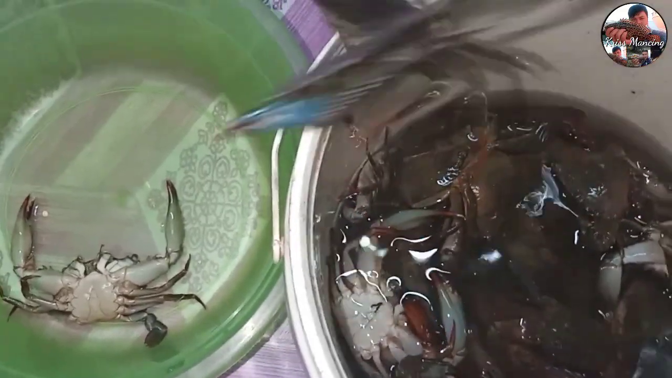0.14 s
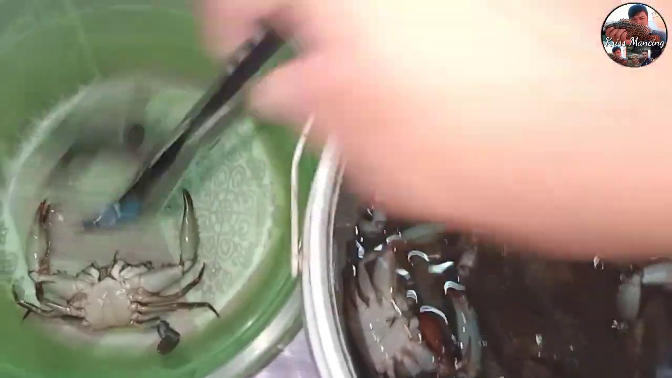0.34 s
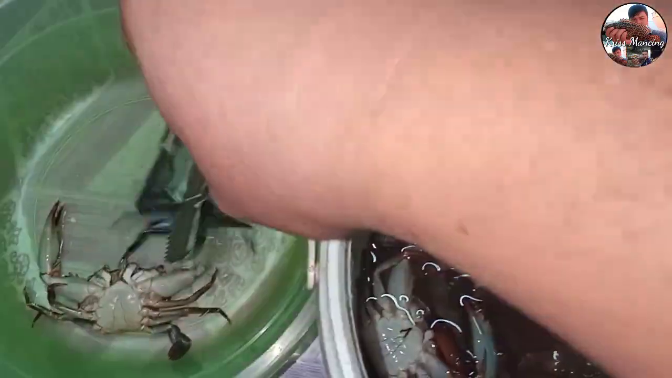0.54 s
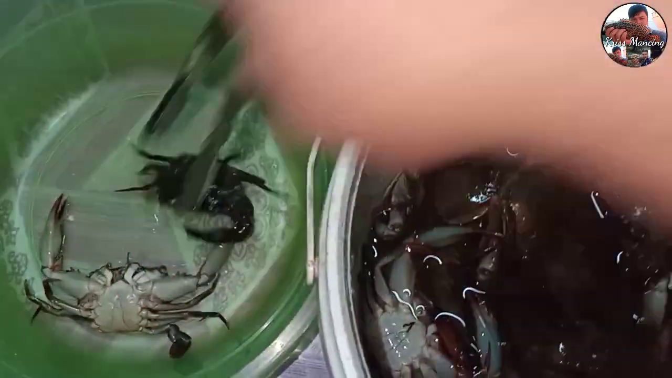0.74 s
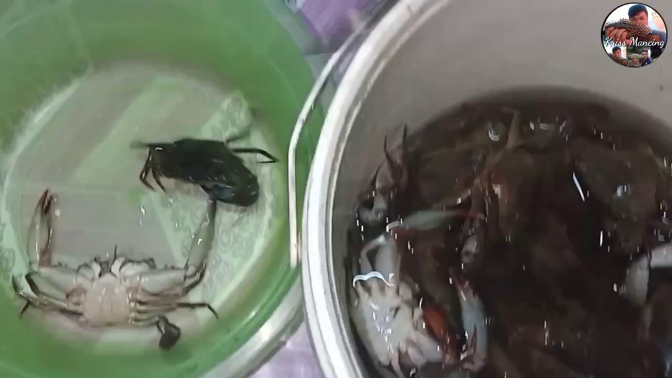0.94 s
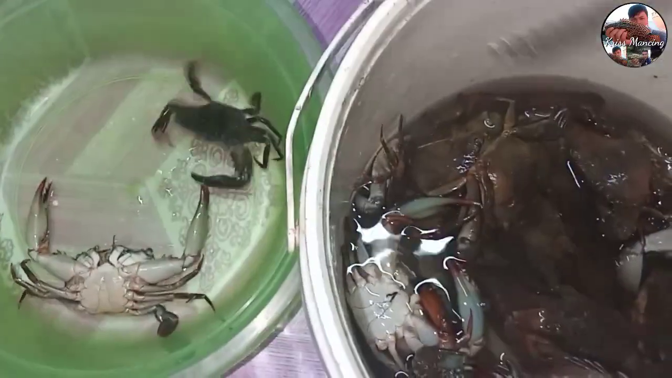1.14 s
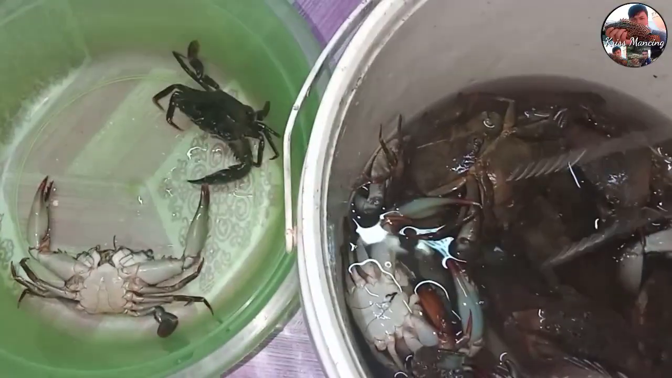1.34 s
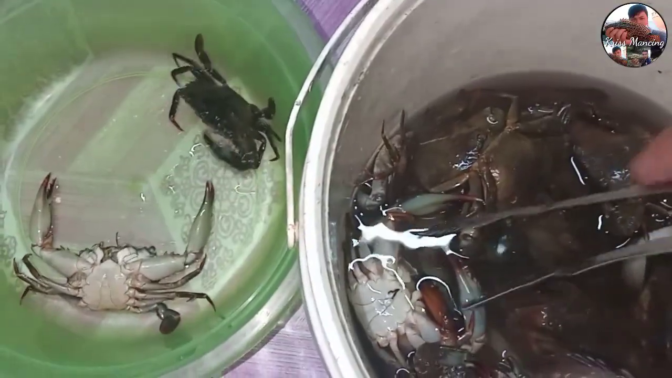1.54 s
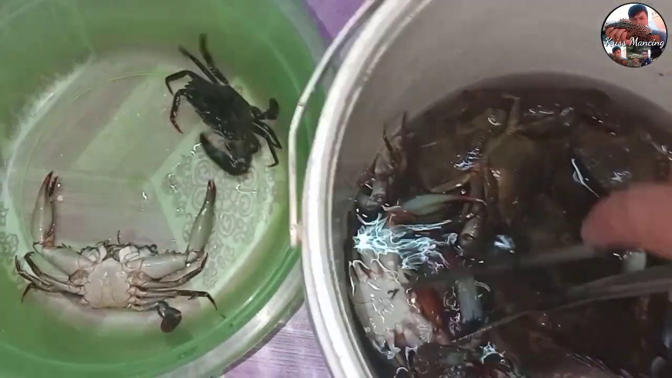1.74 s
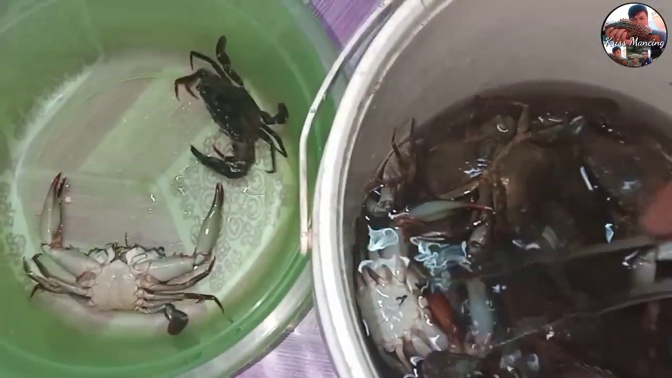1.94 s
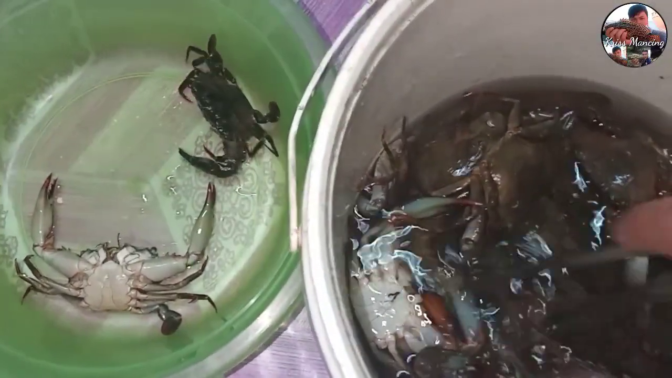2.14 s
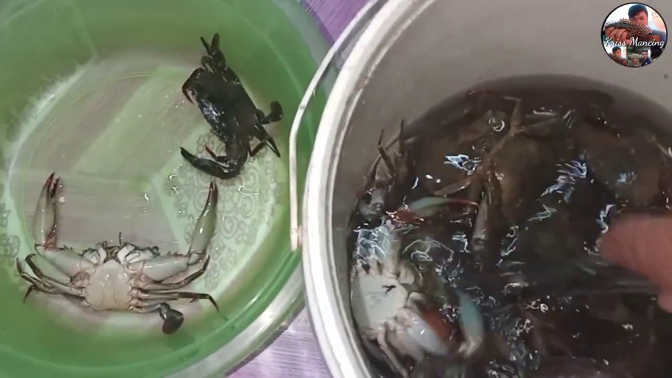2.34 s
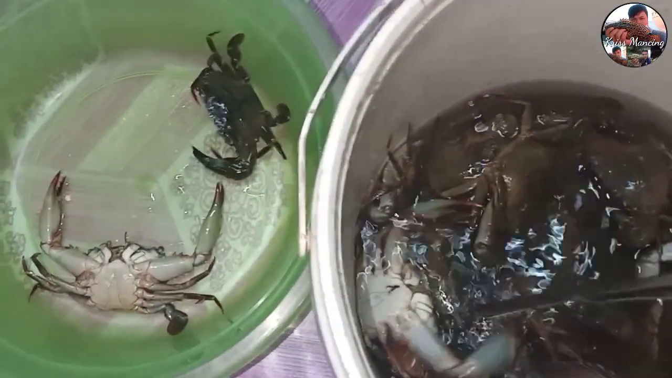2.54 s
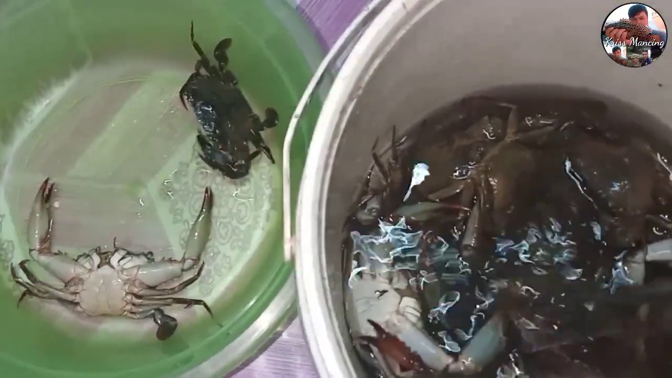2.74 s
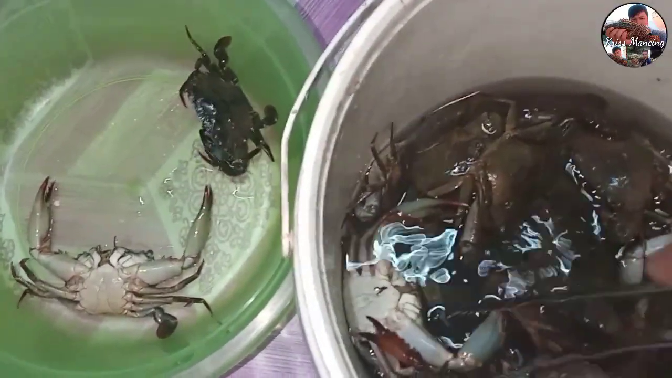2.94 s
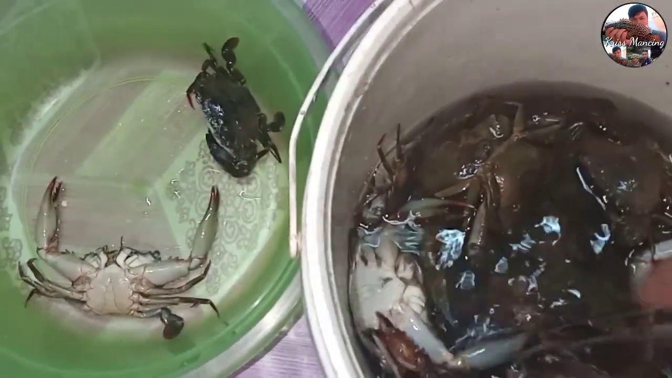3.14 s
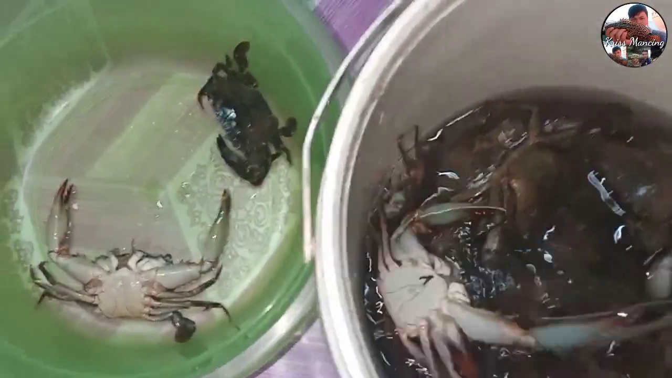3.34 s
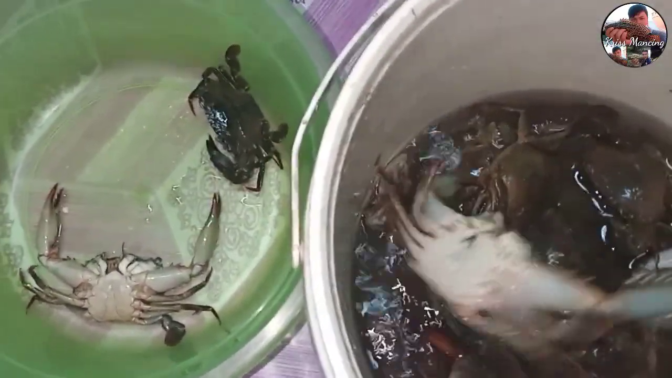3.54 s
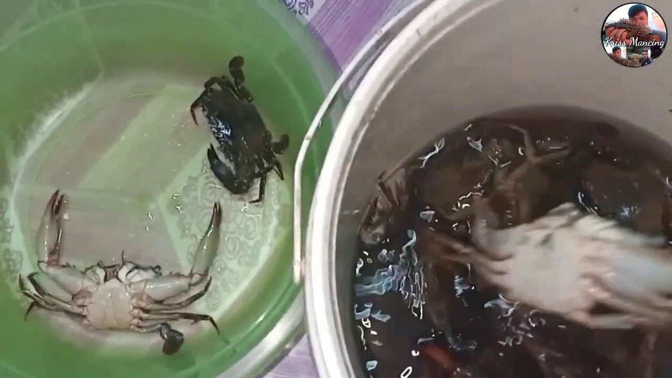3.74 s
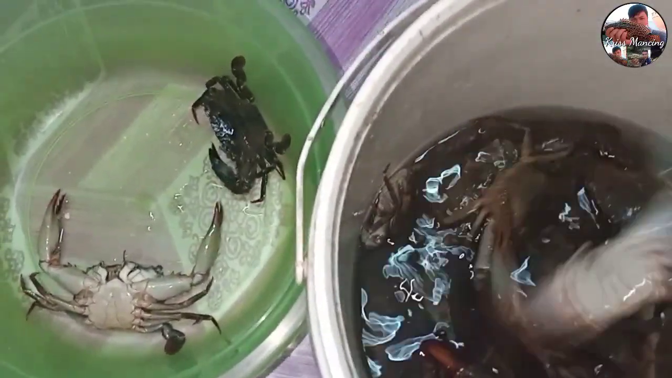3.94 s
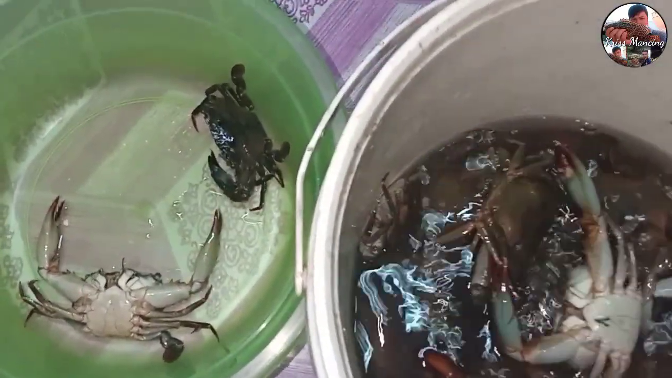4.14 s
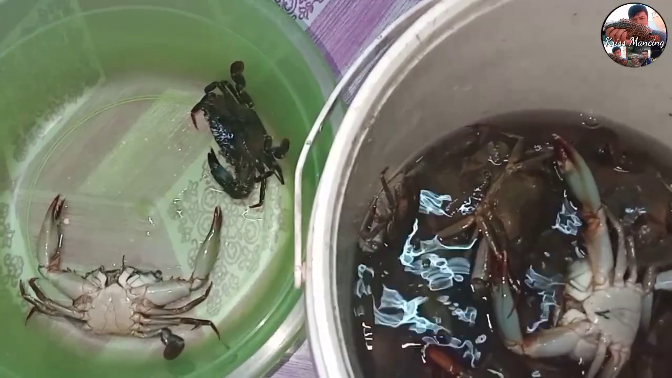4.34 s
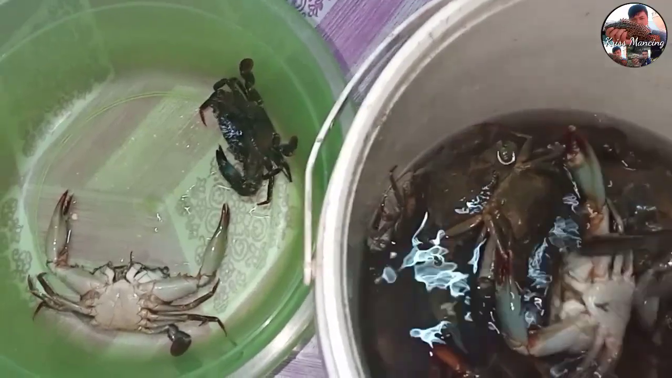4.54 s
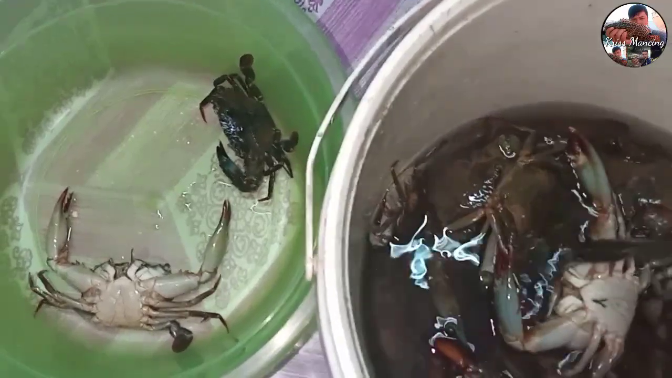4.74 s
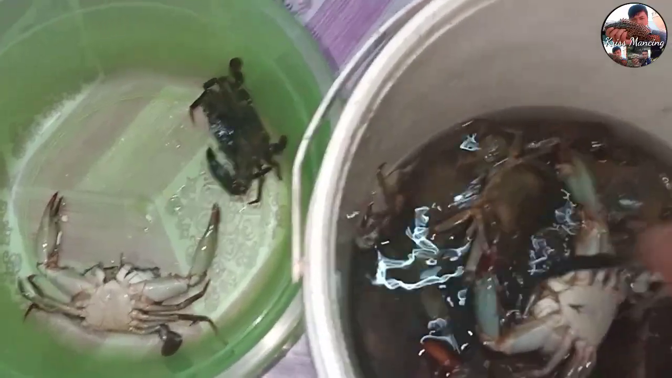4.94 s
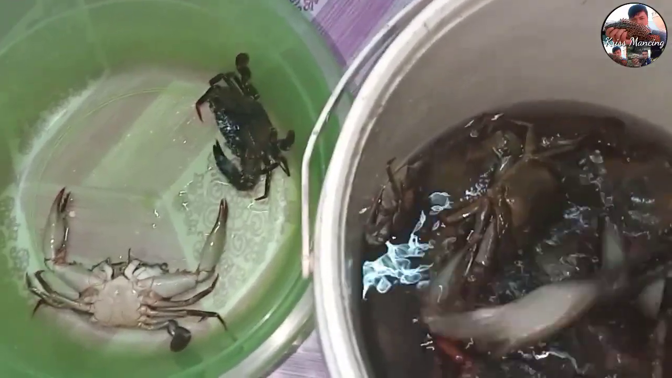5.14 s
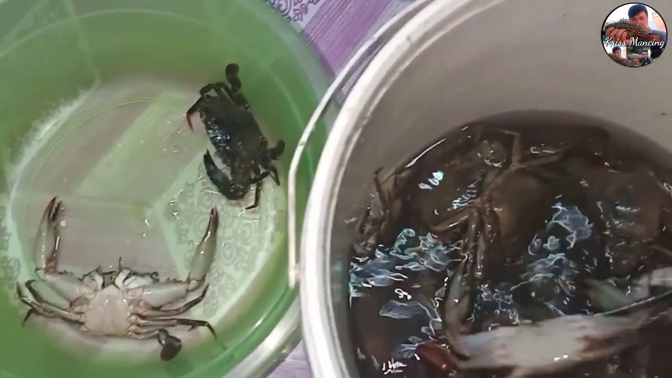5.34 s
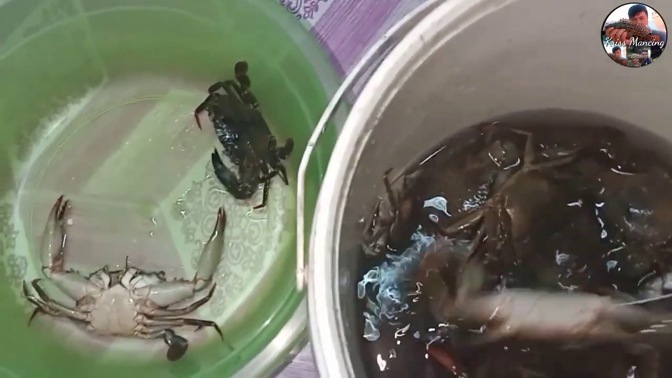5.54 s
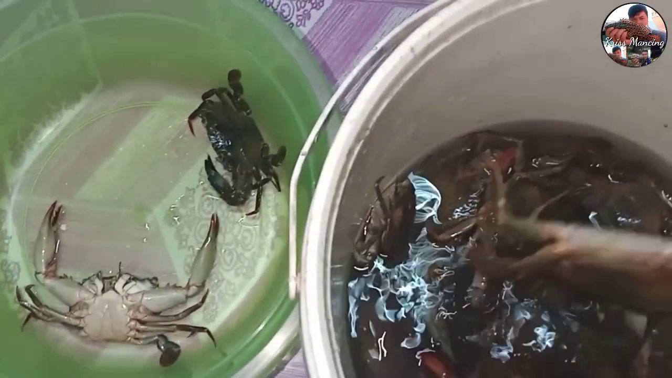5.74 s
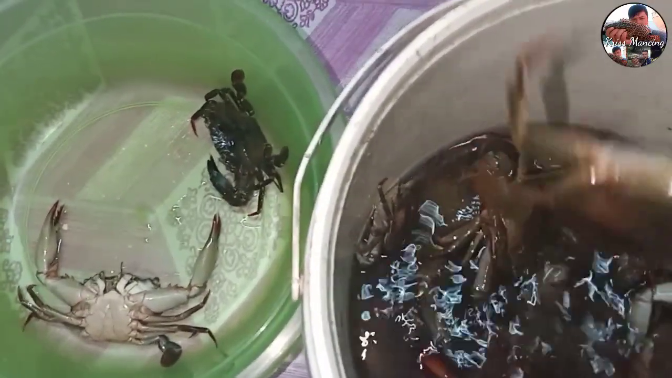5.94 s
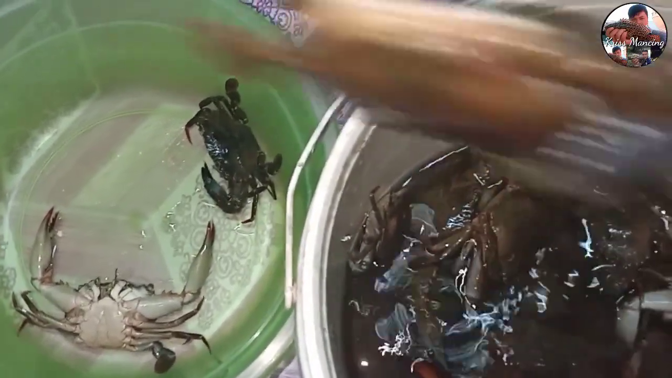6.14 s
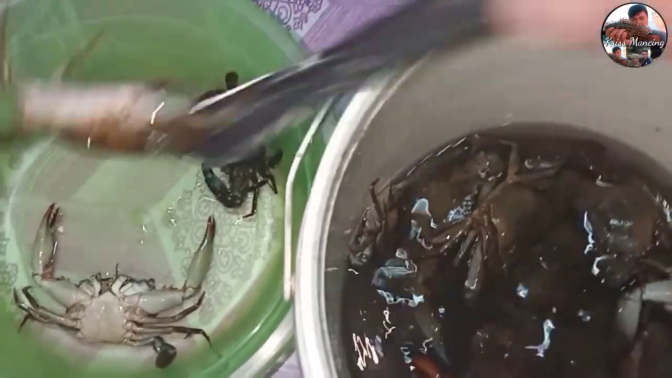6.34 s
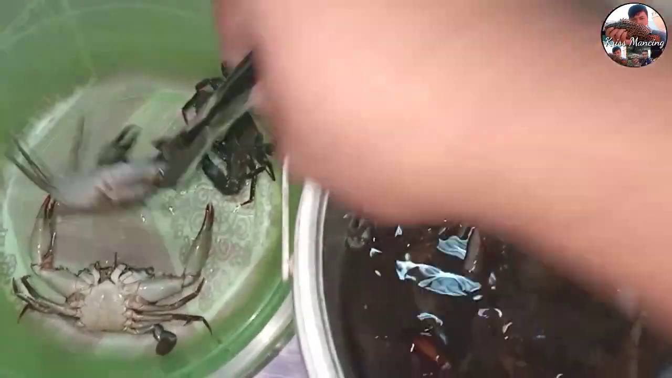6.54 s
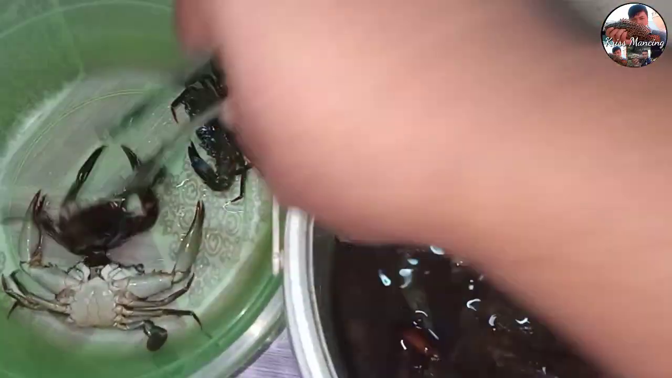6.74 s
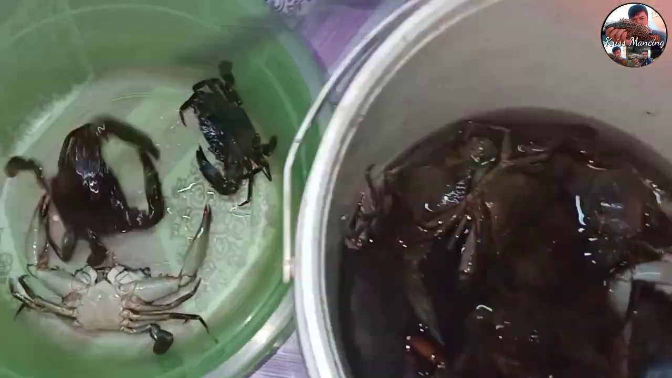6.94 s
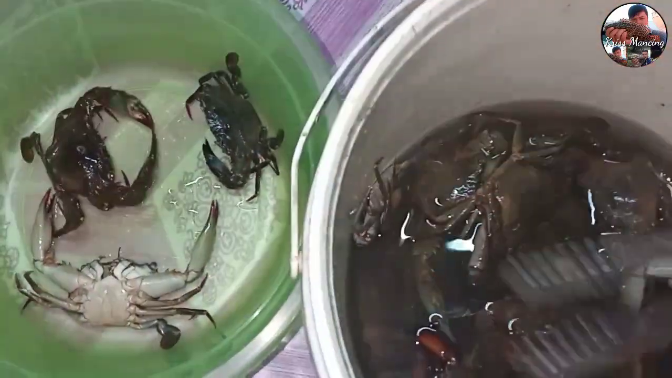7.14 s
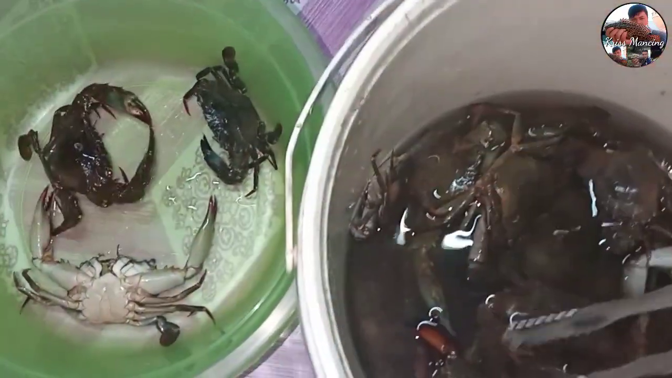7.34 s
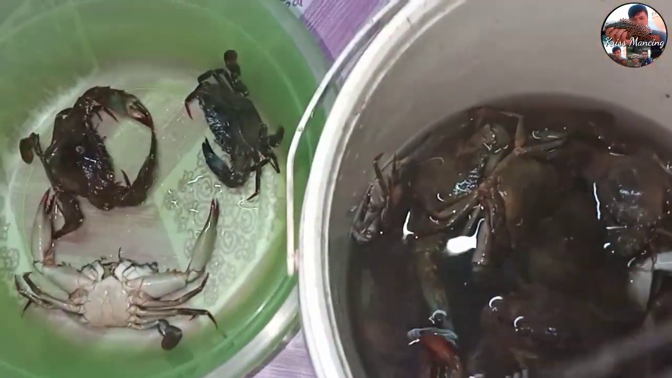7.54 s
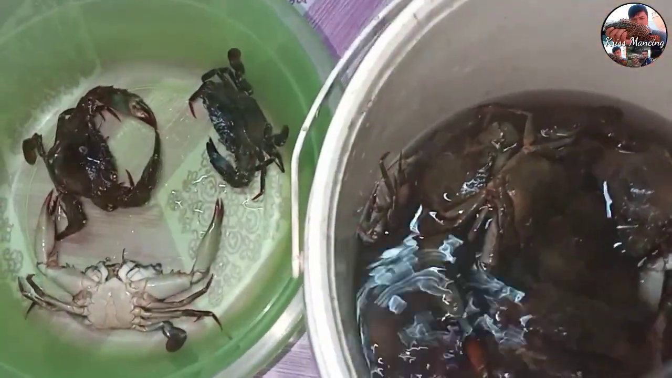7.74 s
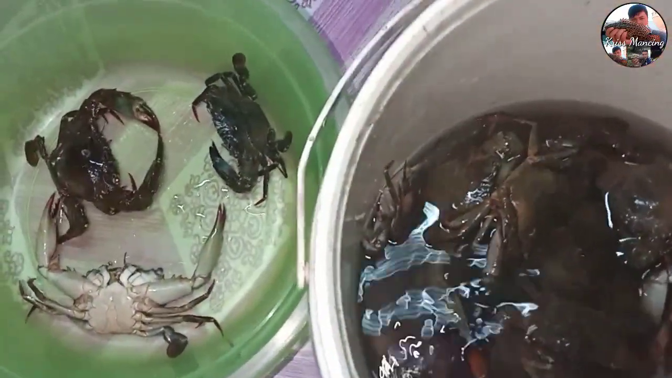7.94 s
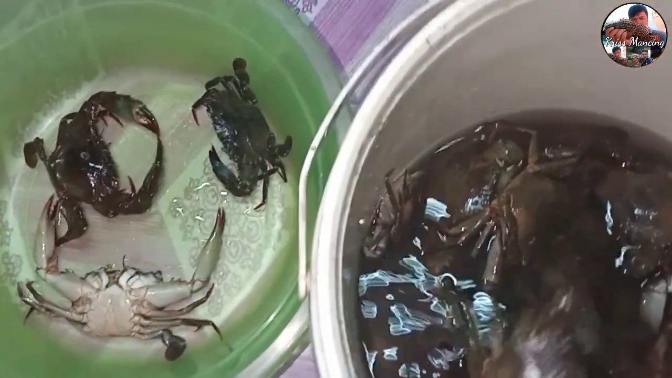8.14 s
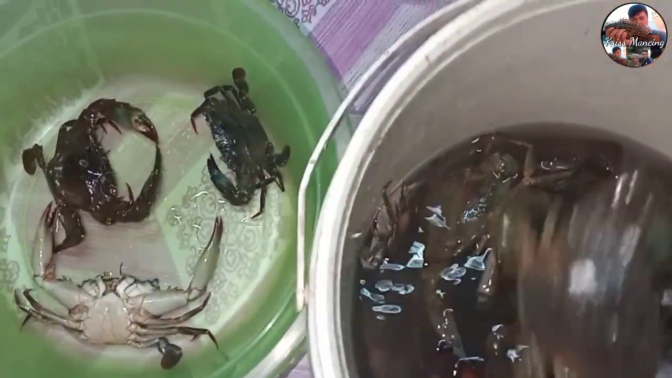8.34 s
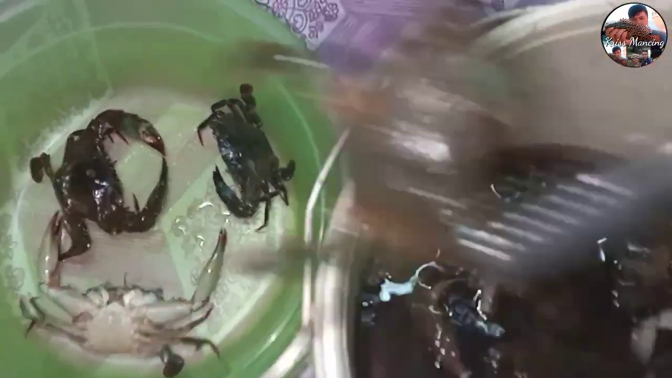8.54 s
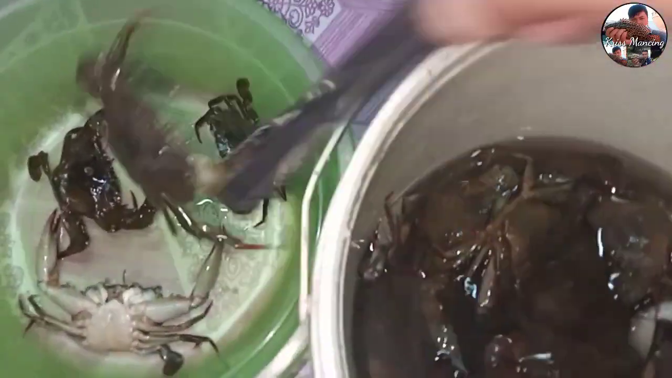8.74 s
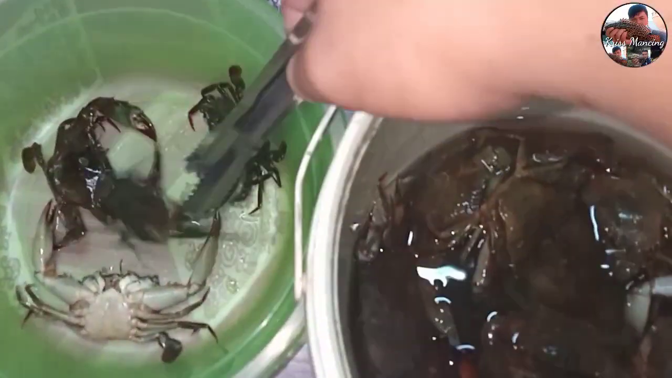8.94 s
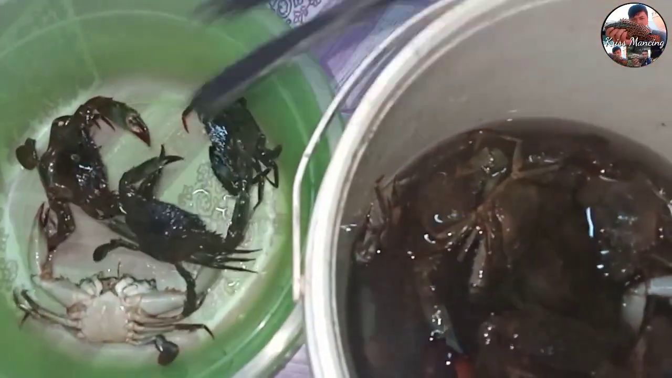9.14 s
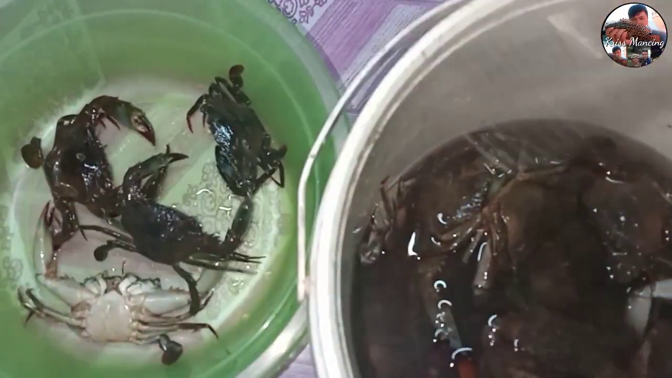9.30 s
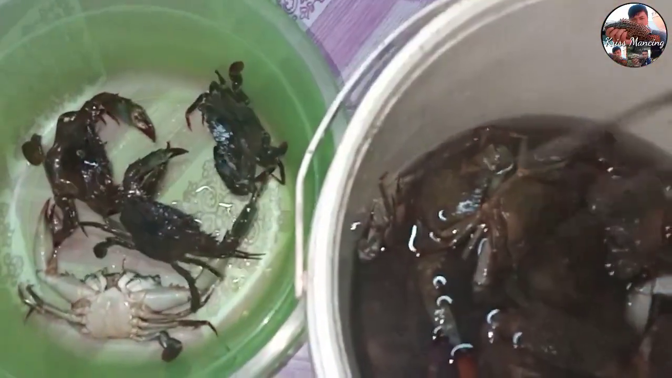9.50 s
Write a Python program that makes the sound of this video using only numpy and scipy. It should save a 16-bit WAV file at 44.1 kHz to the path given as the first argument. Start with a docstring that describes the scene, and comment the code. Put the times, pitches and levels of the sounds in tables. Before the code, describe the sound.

Close up in a small room, a crab knocks and scrabbles on a plastic basin, then steel tongs scrape and stir through wet shells in a bucket, with low thumps and two violent snaps. Another crab clatters into the basin, the tongs stir briefly, and a final crab lands in a hard rattle. A thin wavering whine and faint hum stay behind.

```python
"""Over a bucket of shallow water and a plastic basin, steel tongs lift live crabs from one into the other.
Shells knock and scrabble on the basin and the tongs clack on its rim: short pitched rings and filtered noise
bursts, grains for the legs. In the bucket the tongs scrape, squeak and stir: shaped noise through steel, shell
and water colours, with low overload thumps. Twice the tongs snap shut close by: a falling blast, a pop and a
steel ring. Behind lie a whine of narrow noise bands, a pulsing insect, mains hum and air; a limiter ducks and
clips the hardest blows."""
import sys
import numpy as np
from scipy import signal
from scipy.fft import rfft, irfft, next_fast_len
from scipy.io import wavfile
from scipy.ndimage import uniform_filter1d, minimum_filter1d, map_coordinates

SR = 44100
rng = np.random.default_rng(int(sys.argv[2]) if len(sys.argv) > 2 else 0)


def waveform_to_disk(signal):
    """Save audio, clipped to [-1, 1], as 16-bit WAV at the path in sys.argv[1]."""
    frames = np.transpose(np.atleast_2d(signal))
    scaled = np.clip(frames, -1, 1) * 32767
    samples = np.round(scaled).astype(np.int16)
    wavfile.write(sys.argv[1], SR, samples)


N = 422037  # samples in the scene
SIZE = 4096  # samples in a short burst or impulse response
TOP_HZ = 15650  # upper edge of the sound


def amp(db):
    """Decibels to gain."""
    return 10 ** (np.asarray(db) / 20)


def unit(x):
    """Scale to rms 1."""
    return x / np.sqrt(np.mean(x ** 2) + 1e-20)


def along(points, hz):
    """Read a curve of (Hz, value) points on a log frequency axis."""
    point_hz, value = np.transpose(points)
    return np.interp(np.log(hz + 1), np.log(point_hz + 1), value)


def wobble(rate):
    """A smooth random curve through this many knots a second."""
    knots = rng.standard_normal(int(N * rate / SR) + 4)
    return map_coordinates(knots, [np.arange(N) * rate / SR])


def filtered(x, response):
    """Multiply the spectrum of x by a function of frequency."""
    m = next_fast_len(len(x) + SR // 4)
    return irfft(rfft(x, m) * response(np.fft.rfftfreq(m, 1 / SR)), m)[:len(x)]


def body(points):
    """Minimum-phase impulse response of a colour, with energy 1: the object answers the moment it is hit."""
    cepstrum = irfft(np.log(amp(along(points, np.fft.rfftfreq(SIZE, 1 / SR)))))
    cepstrum[1:SIZE // 2] *= 2
    cepstrum[SIZE // 2 + 1:] = 0
    h = irfft(np.exp(rfft(cepstrum)))
    return h / np.linalg.norm(h)


def through(x, h):
    """Sound x through an impulse response."""
    return signal.fftconvolve(x, h)[:len(x)]


def resonant(x, hz, q):
    """Sound x through one damped resonance."""
    return signal.lfilter(*signal.iirpeak(hz, q, SR), x)


def sized(x, length):
    """Give a burst the energy of this many seconds at rms 1."""
    return x * np.sqrt(length * SR / (np.sum(x ** 2) + 1e-20))


def add(track, s, x):
    """Mix x into the track at time s."""
    i = max(round(s * SR), 0)
    track[i:i + len(x)] += x[:len(track) - i]


def swell(t, rise_s, fall_s):
    """Envelope that builds up to time 0 and dies away."""
    return np.exp(-np.where(t < 0, (t / rise_s) ** 2, np.abs(t / fall_s)))


def grains(rate, hz, cycles, hiss):
    """Tiny contacts or bubbles at random times, each with its own pitch and size, over a hiss."""
    chance = rng.standard_normal((int(rate * N / SR), 2))
    t = np.arange(256) / SR
    pitch = np.minimum(hz * np.exp(.4 * chance[:, :1]), TOP_HZ)
    strength = amp(6 * np.minimum(chance[:, 1:], 2))
    waves = strength * np.sin(2 * np.pi * pitch * t) * np.exp(-pitch * t / cycles)
    at = rng.integers(0, N, (len(chance), 1)) + np.arange(len(t))
    contacts = np.bincount(at.ravel(), waves.ravel(), N)[:N]
    return unit(unit(contacts) + hiss * rng.standard_normal(N))


def effort(bouts, column, attack_s, release_db_per_s):
    """Gain per sample: each bout sets in quickly, holds its level for its length, then dies away."""
    t, gain = np.arange(N) / SR, np.zeros(N)
    for start, length, *level_db in bouts:
        release_db = release_db_per_s * np.maximum(t - start - length, 0)
        onset = np.clip((t - start) / attack_s, 0, 1)
        gain = np.maximum(gain, onset * amp(level_db[column] - release_db))
    return gain


def moments(bouts, count):
    """Random moments spread through the bouts, and the levels of the bout that each falls in."""
    start, length, *level_db = np.transpose(bouts)
    ends = np.cumsum(length)
    at = (np.arange(count) + rng.random(count)) / count * ends[-1]
    i = np.searchsorted(ends, at)
    return start[i] + ends[i] - at, np.array(level_db)[:, i]


# Decay of the room. Each row: frequency in Hz, time to fall 60 dB in seconds.
ROOM_DECAY = [(100, 0.06), (500, 0.26), (1500, 0.18), (3700, 0.24), (9000, 0.19), (15000, 0.35)]


def room(x, wet_db, near_db, near_t60):
    """Short near echoes and a longer room decay, made of noise tails redrawn five times a second."""
    out, step = np.zeros(N), SR // 5
    for i in range(0, N, step):
        hz, t, z = signal.stft(rng.standard_normal((2, SR // 3)), SR, nperseg=256)
        far_fade = amp(-60 * t / along(ROOM_DECAY, hz)[:, None])
        far = signal.istft(z[0] * far_fade, SR, nperseg=256)[1]
        near = signal.istft(z[1] * amp(-60 * t / near_t60), SR, nperseg=256)[1]
        tail = amp(wet_db) * far / np.linalg.norm(far) + amp(near_db) * near / np.linalg.norm(near)
        add(out, i / SR + .002, signal.fftconvolve(x[i:i + step], tail))
    return out


# Colour of the faint room noise. Each row: frequency in Hz, relative density in dB per Hz.
AIR_COLOUR = [(25, -12.5), (45, 19), (100, 14), (160, 16.5), (250, 10.5), (400, 11.5), (480, 8), (560, 9),
              (1000, 2.5), (2300, 10.5), (3700, 1), (5400, -15.5), (9000, -26.5), (11000, -29),
              (16000, -23)]


def air(level_db=-53):
    """Faint room noise: steady random pressure with a fixed colour."""
    return amp(level_db) * unit(filtered(rng.standard_normal(N), lambda f: amp(along(AIR_COLOUR, f))))


# Mains hum. Each row: frequency in Hz, rms level in dB.
HUM_TONES = [(50, -75.5), (100.4, -55.5), (400.5, -67)]


def hum():
    """Mains tones whose phases wander slightly."""
    t = np.arange(N) / SR
    return sum(np.sqrt(2) * amp(db) * np.sin(2 * np.pi * hz * t + .25 * wobble(2.8)) for hz, db in HUM_TONES)


# Close resonances of the whine. Each row: centre in Hz, half-width at -6 dB in Hz, relative level in dB.
WHINE_PEAKS = [(2114, 25, -17.5), (2340, 33, -11.5), (2233, 47, -3), (2342, 20, 2.5), (2330, 9.2, -10),
               (2578, 18, -10.5), (2420, 18, 0.5), (2450, 11, 4.5), (2506, 20, -12), (2400, 18, -12)]


def whine(level_db=-43):
    """Noise through narrow resonances set so close that they beat against each other."""
    def peaks(f):
        return np.sqrt(sum(amp(db) ** 2 / (1 + ((f - hz) / width) ** 2) ** 2 for hz, width, db in WHINE_PEAKS))
    return amp(level_db) * unit(filtered(rng.standard_normal(N), peaks))


def insect(hz=7400, q=10, level_db=-69.5):
    """A far insect's high trill: a narrow noise band pulsing about nine times a second."""
    trill = unit(resonant(resonant(rng.standard_normal(N), hz, q), hz, q))
    pulse_db = 4 * np.sin(2 * np.pi * 9.2 * np.arange(N) / SR + .5 * wobble(2))
    return trill * amp(level_db + pulse_db)


def wet_ticks(hz=6000, pitch_spread=.35, q=2.5, life_s=0.0005, level_db=-54, spread_db=5):
    """Tiny bubbles burst on the wet crabs throughout: decaying noise through a damped resonance."""
    out, t = np.zeros(N), np.arange(SIZE // 8) / SR
    for s in rng.uniform(0, N / SR, size=70):
        pitch, strength = rng.standard_normal(2)
        burst = rng.standard_normal(len(t)) * np.exp(-t / life_s)
        tick = resonant(burst, min(hz * np.exp(pitch_spread * pitch), TOP_HZ), q)
        add(out, s, amp(level_db + spread_db * strength) * sized(tick, life_s))
    return out


# Bright tick of the steel. Each row: frequency in Hz, relative level in dB.
STEEL_COLOUR = [(3500, -19.5), (5200, 3), (6500, 3), (8000, 10.5), (9300, 2), (11500, -5.5), (13400, 0.5),
                (16000, -0.5)]
# Ringing modes of the tongs. Each row: frequency in Hz, bandwidth in Hz, relative level in dB.
TONGS_MODES = [(4670, 49, -7), (5400, 770, -23.5), (5670, 65, -14), (7050, 170, -2.5), (7600, 70, -2),
               (7940, 320, -3.5), (9140, 450, -8), (14030, 510, -14)]


def steel(ring_share):
    """Impulse response of the tongs: a bright tick and decaying modes, the narrow ones ringing longest."""
    t = np.arange(SIZE) / SR
    ring = sum(amp(db) * width * np.exp(-np.pi * width * t) * np.sin(2 * np.pi * hz * t)
               for hz, width, db in TONGS_MODES)
    return body(STEEL_COLOUR) + ring_share * ring / np.linalg.norm(ring)


# Strokes of the tongs through the bucket. Each row: start in seconds, length in seconds, then the
# grinding, water and steel levels in dB before the layer trims.
STIR_STROKES = [(1.76, .11, -34.5, -35, -36.5), (1.98, .03, -39, -57, -35), (2.13, .08, -44, -56, -51),
                (2.24, .28, -39, -37.5, -39), (2.55, .05, -35, -60, -40), (3.05, .09, -50.5, -77, -70),
                (3.16, .13, -38.5, -39.5, -38), (3.39, .09, -28.5, -44, -32), (3.6, .05, -39.5, -39, -43),
                (3.68, .06, -51.5, -56.5, -42), (4.13, .05, -36.5, -37.5, -39.5),
                (4.62, .04, -39, -33, -43.5), (4.67, .1, -35, -41, -32), (4.86, .19, -32, -33, -31),
                (5.1, .2, -29, -33.5, -31), (5.33, .1, -40, -47, -41), (5.52, 0.38, -56, -68, -55.5),
                (7.64, .19, -28.5, -37.5, -29.5), (7.88, 0.17, -40, -45, -49.5),
                (8.1, .08, -36.5, -56, -33.5)]
# Colour of water in the hollow bucket. Each row: frequency in Hz, relative level in dB.
WATER_COLOUR = [(150, -18.5), (330, -11), (450, -0.5), (600, -11), (850, -11), (1010, 7), (1200, -15),
                (1550, 4.5), (1900, -2), (2800, -9.5), (6000, -44)]
# Colour of shell rasping on steel, also for scrapes and snaps. Each row: frequency in Hz, relative level in dB.
RASP_COLOUR = [(400, -20.5), (800, -5.5), (1010, -10.5), (1250, -8.5), (2000, -3), (2600, 1.5), (3330, 3.5),
               (4200, 0.5), (5400, -7), (7000, -14.5), (12000, -31)]


def stir(water_db=-2, rasp_db=-2, steel_db=-4, attack_s=0.009, release_db_per_s=230, unsteady_db=2):
    """With each stroke water sloshes in the hollow of the bucket while wet shells grind along the tongs."""
    push = amp(unsteady_db * wobble(30))
    grind, water, metal = (push * effort(STIR_STROKES, column, attack_s, release_db_per_s) for column in range(3))
    slosh = grains(rate=500, hz=950, cycles=3, hiss=.8)
    grit = grains(rate=1100, hz=5500, cycles=1, hiss=.45)
    return (amp(water_db) * water * unit(through(slosh, body(WATER_COLOUR)))
            + amp(rasp_db) * grind * unit(through(grit, body(RASP_COLOUR)))
            + amp(steel_db) * metal * unit(through(grit, steel(ring_share=0.2))))


# Low overload thumps. Each row: peak time in seconds, level in dB before the trim.
OVERLOAD_THUMPS = [(2.306, -35.5), (2.347, -27.5), (2.468, -17), (2.498, -13), (3.155, -24), (3.387, -27.5),
                   (3.403, -16.5), (4.126, -21), (4.9, -25.5), (5.222, -22), (5.264, -28.5), (5.286, -16.5),
                   (5.695, -29.5), (7.67, -28), (8.097, -22.5)]
# Colour of the low thump, also for scrapes. Each row: frequency in Hz, relative level in dB.
THUMP_COLOUR = [(25, -45), (55, -12.5), (120, 2.5), (250, 0), (450, 1), (900, -33.5), (3000, -76.5)]


def overload_thumps(rise_s=0.0022, fall_s=0.0035, rough=3, thump_db=-1):
    """Low overload thumps: the microphone is pushed by the loudest scrapes; a rough pulse in a low colour."""
    out, t = np.zeros(N), (np.arange(SIZE) - SIZE // 4) / SR
    envelope, thump = swell(t, rise_s, fall_s), body(THUMP_COLOUR)
    for s, db in OVERLOAD_THUMPS:
        pulse = envelope ** 2 + rough * envelope * rng.standard_normal(SIZE)
        add(out, s + t[0], amp(db + thump_db) * sized(through(pulse, thump), fall_s))
    return out


# Squeaks of shell along steel. Each row: start in seconds, length in seconds, starting pitch in Hz, rms in dB.
SHELL_SQUEAKS = [(0.26, 0.024, 1694, -22), (0.415, 0.023, 2730, -21.5), (1.1, 0.027, 1528, -19.5),
                 (1.37, 0.017, 2554, -26.5), (2.359, .07, 3016, -29), (3.383, 0.01, 4195, -6),
                 (5.2, 0.05, 3500, -16), (7.809, .016, 1840, -17.5)]


def squeaks(glide_octaves_per_s=4, rough_db=4):
    """Shell slides along steel in a rough, broken squeak: a jittered tone gliding upward."""
    out, t = np.zeros(N), np.arange(N) / SR
    for s, length, hz, db in SHELL_SQUEAKS:
        u = t[:int(length * SR)]
        jitter = .09 * wobble(1500)[:len(u)]
        pitch = hz * 2 ** (glide_octaves_per_s * u) * np.exp(jitter)
        tone = np.sin(2 * np.pi * np.cumsum(pitch) / SR) * amp(rough_db * wobble(200)[:len(u)])
        add(out, s, amp(db) * unit(tone * np.sqrt(np.sin(np.pi * u / length))))
    return out


def slips(length_s=.0042, hz=7900, pitch_spread=.1, over_db=4, spread_db=4.0, metal_db=5):
    """Light slips of the tongs, scattered through the stirring strokes, their levels following each stroke."""
    s, (grind_db, _, steel_db) = moments(STIR_STROKES, count=80)
    pitch, size = rng.standard_normal((len(s), 2)).T
    return list(zip(s, np.full(len(s), length_s), hz * np.exp(pitch_spread * pitch),
                    grind_db + over_db + spread_db * size, steel_db + metal_db + spread_db * size))


# Hard slips of the tongs over shell. Each row: peak time in seconds, length in seconds, steel pitch in Hz,
# rasp level in dB, steel level in dB.
HARD_SLIPS = [(1.761, .003, 8300, -10.5, -15.5), (1.808, .0066, 6700, -36, -20),
              (1.827, .0067, 6670, -24, -15.5), (1.988, .012, 8400, -23.5, -20.5),
              (2.239, .0046, 8540, -23, -19), (2.305, .009, 8330, -17.5, -14.5),
              (2.348, .0043, 8600, -13, -14), (2.436, .004, 7040, -17, -17.5),
              (2.47, 0.0019, 7000, -9.5, -5), (2.498, .003, 7100, -16.5, -18), (2.503, .003, 7100, -11, -9),
              (2.556, .005, 7060, -17.5, -37.5), (3.156, .0034, 8030, -21, -8.5),
              (3.171, .0058, 6600, -19, -16), (3.23, .006, 7700, -17, -18.5), (3.267, .004, 7000, -25, -20),
              (3.295, .0045, 6130, -21.5, -18), (3.39, .0048, 9220, -4.5, -2), (3.401, .003, 7000, -20, -3),
              (3.807, .005, 6620, -28, -29), (3.963, .003, 6500, -33, -34), (4.127, .002, 7500, -8, -9),
              (4.134, .003, 7590, -7.5, -23), (4.153, .008, 7200, -15, -24), (4.617, .0034, 8000, -23, -27),
              (4.704, .0035, 8100, -19, -13.5), (4.773, .005, 9450, -36, -25),
              (4.833, .0054, 8200, -20, -19.5), (4.873, .003, 8170, -22, -10),
              (4.899, .007, 8050, -12.5, -9), (4.913, .008, 8700, -19, -15.5),
              (4.933, .011, 7400, -14, -14.5), (4.989, .0045, 7410, -21.5, -15.5),
              (5.033, .006, 8200, -18, -17.5), (5.16, .005, 6970, -15, -15.5),
              (5.175, .0043, 6000, -16.5, -14), (5.191, .0045, 5640, -11, -11.5),
              (5.217, .013, 5370, -19.5, -11.5), (5.266, .004, 7540, -14.5, -17),
              (5.291, .0065, 9160, -10, -13), (5.418, .002, 7000, -32, -43), (5.527, .0033, 9350, -30, -45),
              (5.639, .003, 9300, -25.5, -23), (5.762, .0054, 9080, -38, -42),
              (7.649, .007, 8300, -18.5, -28), (7.67, .0055, 7850, -16, -8.5),
              (7.712, .005, 7550, -17, -21), (7.787, .009, 8100, -17.5, -19.5),
              (7.814, .005, 8300, -20, -25.5), (7.896, .011, 7750, -20.5, -26.5),
              (8.059, .0027, 8000, -13, -18.5), (8.099, .0055, 7150, -9.5, -10)]


def scrapes(shell_hz=3450, pitch_spread=0.093, shell_q=4, squeak=0.72, steel_q=14, thump_db=-28,
            catch_db=4.5, skirt=.06, skirt_s=0.0026):
    """Each slip swells and dies within milliseconds, rasping the shell and ringing the steel, with a faint low thump."""
    out, t = np.zeros(N), (np.arange(SIZE) - SIZE // 4) / SR
    rasp, tongs, thump = body(RASP_COLOUR), steel(ring_share=0.45), body(THUMP_COLOUR)
    for s, length, steel_hz, mid_db, high_db in HARD_SLIPS + slips():
        # the steel sticks and lets go
        catches = amp(catch_db * unit(uniform_filter1d(rng.standard_normal(SIZE), size=60)))
        # a faint soft skirt lies on both sides of the peak
        force = swell(t, length, length) + skirt * np.exp(-np.abs(t / skirt_s))
        a, b, c = catches * force * rng.standard_normal((3, SIZE))
        squeak_hz = shell_hz * np.exp(pitch_spread * rng.standard_normal())
        shell = sized(through(a, rasp), 1.0) + squeak * sized(resonant(b, squeak_hz, shell_q), 0.4)
        # the place of contact picks the pitch that sings out over the tongs' modes
        metal = sized(through(b, tongs), 0.28) + sized(resonant(c, steel_hz, steel_q), 0.78)
        add(out, s + t[0] - .0005, amp(mid_db) * sized(shell, length)
            + amp(high_db) * sized(metal, length)
            + amp(mid_db + thump_db) * sized(through(a, thump), length))
    return out


# Tongs snapping shut. Each row: start in seconds, length in seconds, starting blast pitch in Hz,
# pop pitch in Hz, then the blast, thump and steel ring levels in dB.
TONG_SNAPS = [(2.6431, 0.0053, 1580, 526, 6, -4.5, -21.5), (3.9872, 0.0048, 1990, 218.2, 10.5, 6.5, -15)]
# Colour of the blast's grit. Each row: frequency in Hz, relative level in dB.
BLAST_COLOUR = [(60, -53), (200, -7.5), (450, -11.5), (900, -12), (1500, 1.5), (3000, -0.5), (4500, -10.5),
                (12000, -21)]


def snaps(swing_hz=115, swing_life=0.0071, ring_t60=0.38, grit=0.96, droop=0.9, pop_life=0.0041, pop_db=2):
    """A harsh blast that drops in pitch, a hollow pop, one slow swing of pressure, and the steel ringing on."""
    out, t = np.zeros(N), np.arange(SR // 2) / SR
    for s, length, hz, pop_hz, blast_db, thump_db, ring_db in TONG_SNAPS:
        a, b = rng.standard_normal((2, len(t)))
        gate = np.exp(-(t / length) ** 4)
        phase = 2 * np.pi * np.cumsum(hz * np.exp(-droop * t / length)) / SR
        rough = sized(through(a * gate, body(BLAST_COLOUR)), 0.99)
        blast = sized(np.sin(phase) * gate, 1) + grit * rough
        swing = np.sin(2 * np.pi * swing_hz * t) * np.exp(-t / swing_life)
        pop = np.sin(2 * np.pi * pop_hz * t) * np.exp(-t / pop_life)
        metal = steel(ring_share=0.23) + 0.31 * body(RASP_COLOUR)
        ring = unit(through(b, metal)) * amp(-60 * t / ring_t60)
        add(out, s, amp(blast_db) * sized(blast, length) + amp(pop_db) * sized(pop, length)
            + amp(thump_db) * sized(swing, length) + amp(ring_db) * ring)
    return out


# Bouts of legs on plastic. Each row: start in seconds, length in seconds, then the shell and basin wall
# levels in dB before the layer trims.
SCRABBLE_BOUTS = [(.0, .16, -44.5, -54), (.23, .06, -38.5, -44.5), (.305, .05, -32, -45),
                  (.38, .02, -39, -33.5), (.414, .022, -30, -52), (.68, .3, -34.5, -36),
                  (1.0, .09, -41, -38), (1.1, .025, -36, -50), (1.18, .15, -36.5, -48),
                  (1.44, .14, -42, -52), (1.62, .12, -46.5, -58), (6.64, .04, -51.5, -47),
                  (6.73, .15, -29.5, -43), (6.95, .1, -38.5, -45.5), (7.09, 0.12, -41, -36),
                  (8.72, .1, -54, -66), (8.92, .12, -50, -51), (9.08, .08, -24.5, -45),
                  (9.19, .12, -40.5, -47), (9.4, .07, -33, -79)]
# Colour of the basin wall, also for knocks. Each row: frequency in Hz, relative level in dB.
WALL_COLOUR = [(40, -26), (100, -6), (190, -11), (310, -6), (480, -3.5), (640, 4), (850, -5.5), (1250, -9),
               (1800, -5), (4000, -51)]
# Colour of the shell, also for knocks. Each row: frequency in Hz, relative level in dB.
SHELL_COLOUR = [(500, -36), (1100, -7), (1500, -7.5), (2000, -1.5), (2900, 0.5), (4100, -1), (5200, -13),
                (8000, -46)]
# Colour of the sharp crack, also for knocks. Each row: frequency in Hz, relative level in dB.
CRACK_COLOUR = [(3000, -25), (5400, -6.5), (6600, -3.5), (8000, 6.5), (9500, -3), (11500, -6.5),
                (13500, -9.5), (16000, -10)]


def scrabble(wall_db=-2, shell_db=-1, crack_db=-14, attack_s=0.005, release_db_per_s=190, unsteady_db=2):
    """Pointed legs tick and drag over the plastic in unsteady bouts: grains through wall, shell and crack."""
    push = amp(unsteady_db * wobble(33))
    shell, wall = (push * effort(SCRABBLE_BOUTS, column, attack_s, release_db_per_s) for column in range(2))
    drag = grains(rate=1500, hz=2200, cycles=2, hiss=.6)
    ticks = grains(rate=1200, hz=6000, cycles=.6, hiss=.6)
    return (amp(wall_db) * wall * unit(through(drag, body(WALL_COLOUR)))
            + amp(shell_db) * shell * unit(through(drag, body(SHELL_COLOUR)))
            + amp(crack_db) * shell * unit(through(ticks, body(CRACK_COLOUR))))


def taps(hz=2500, pitch_spread=0.242, over_db=9, spread_db=1.5, tip_db=-14, floor_db=5):
    """Light taps of single legs, scattered through the scrabbling, their levels following each bout."""
    s, (shell_db, wall_db) = moments(SCRABBLE_BOUTS, count=84)
    pitch, size = rng.standard_normal((len(s), 2)).T
    tap_db = shell_db + over_db + spread_db * size
    basin_db = wall_db + floor_db + spread_db * size
    return list(zip(s, hz * np.exp(pitch_spread * pitch), tap_db, tap_db + tip_db, basin_db))


# Hardest contacts in the basin: shells knocking and, at the lowest pitches, the tongs clacking on the rim. #
# Each row: time in seconds, ring pitch in Hz, then the ring, crack and basin wall levels in dB.
BASIN_KNOCKS = [(0.0889, 3350, -20, -27, -40), (0.143, 3600, -26.5, -26, -55), (.2367, 1720, -21, -55, -40),
                (0.2479, 1790, -16.5, -55, -50), (0.3068, 1605, -8, -41, -48),
                (.317, 3650, -13.5, -33, -50), (0.3256, 1780, -11.5, -33, -39),
                (.379, 3290, -5.5, -24, -12.5), (.409, 1710, -8.5, -32, -38), (.432, 1800, -15, -28.5, -48),
                (0.6715, 2980, -5, -29, -23), (.688, 2520, -15, -29, -11), (.701, 2330, -14, -35, -17),
                (.711, 2360, -2.5, -26, -4.5), (.737, 1810, -15, -38, -26),
                (0.7699, 1860, -17, -30.5, -10.5), (0.7792, 3100, -10.5, -44, -28),
                (.8856, 1880, -14.5, -37, -28), (.939, 2790, -12, -21.5, -19.5),
                (.948, 2390, -9.5, -33, -14.5), (0.9842, 3130, -3, -32, -23.5),
                (1.0646, 2520, -17, -37, -27), (1.0972, 1660, -2.5, -19, -18.5),
                (1.1056, 1560, -14.5, -31, -49), (1.1224, 1480, -24, -44, -35),
                (1.247, 2830, -19.5, -40, -55), (1.3042, 1200, -20, -31.5, -18.5),
                (1.3808, 2320, -17, -27, -38), (6.325, 2640, -52, -59, -66),
                (6.6726, 1840, -34, -60.5, -39.5), (6.7247, 3200, -25.5, -25.5, -38),
                (6.7551, 3920, -16, -18, -46), (6.7801, 4090, -6, -22, -17),
                (6.7868, 1866, -13, -22, -16.5), (6.7998, 2825, -3.5, -19, -10),
                (6.812, 2800, -1.5, -18, -12.5), (6.847, 2030, -13, -40, -15.5),
                (6.861, 1830, -15, -16.5, -21), (6.88, 2360, -7, -29, -13.5),
                (7.0914, 3010, -10.5, -26, -26), (7.105, 2040, -14, -36, -35), (7.132, 2440, -25, -35, -32),
                (7.1405, 1950, -2, -31, -11), (7.147, 2070, -3.5, -19, -10),
                (7.1782, 1937, -9.5, -26, -19.5), (7.1885, 2740, -10, -30, -20),
                (7.426, 3210, -40.5, -58, -56), (8.4575, 2670, -29.5, -47, -68),
                (8.706, 2800, -30.5, -62, -57), (8.745, 4330, -32, -49, -56),
                (8.809, 2840, -28.5, -37.5, -52), (9.0088, 4530, -22, -25, -46),
                (9.0428, 2920, -15, -24, -55), (9.07, 2360, -11.5, -22, -24), (9.0841, 2150, -1, -15, -9.5),
                (9.0946, 1990, -7, -13, -9), (9.109, 2020, -2.5, -31, -9), (9.117, 2680, -3.5, -20, -7),
                (9.1266, 3250, -6, -26, -15.5), (9.1584, 2870, -10.5, -28, -20),
                (9.228, 1850, -19, -56, -35), (9.33, 2660, -27.5, -24.5, -36.5),
                (9.3867, 1760, -1.5, -28, -19), (9.405, 1570, -2.5, -19, -26)]
KNOCK_S, KNOCK_HZ = 0.0018, 2460  # reference length and its pitch; lower knocks last longer in proportion


def knocks(ring_life=0.51, crack_life=0.64, wall_life=1.14, lead_in=0.017, lead_in_s=0.0041, shell_q=0.7,
           attack=0.3, rebound=0.32, rebound_s=.005):
    """Each knock has a faint soft lead-in; it rings briefly at its pitch, cracks, drums the wall and rebounds
    once."""
    out, t = np.zeros(N), (np.arange(SIZE) - SIZE // 8) / SR
    after = np.maximum(t, 0)
    soft_edge = lead_in * np.exp(-np.abs(t / lead_in_s))
    shell, crack, wall = body(SHELL_COLOUR), body(CRACK_COLOUR), body(WALL_COLOUR)
    for s, hz, mid_db, high_db, low_db in BASIN_KNOCKS + taps():
        length = KNOCK_S * KNOCK_HZ / hz
        later = np.maximum(t - rebound_s * rng.uniform(0.464, 2), 0)

        def strike(u, life):
            return np.exp(-u / (life * length)) * (1 - np.exp(-u / (attack * length)))

        def fade(life):
            return soft_edge + strike(after, life) + rebound * strike(later, life)

        a, b, c = rng.standard_normal((3, SIZE))
        ring = np.sin(2 * np.pi * hz * t) * fade(ring_life)
        rattle = resonant(through(a * fade(ring_life), shell), hz, shell_q)
        knock = sized(ring, length) + 0.91 * sized(rattle, length)
        add(out, s + t[0] - .0004, amp(mid_db) * sized(knock, KNOCK_S)
            + amp(high_db) * sized(through(b * fade(crack_life), crack), KNOCK_S)
            + amp(low_db) * sized(through(c * fade(wall_life), wall), KNOCK_S))
    return out


def scene(basin_hz=650, bucket_hz=1010):
    """Basin and bucket side by side under one microphone; the air in each holds its own note."""
    backdrop = air() + hum() + whine() + insect()
    bucket = wet_ticks() + overload_thumps() + squeaks() + scrapes()
    basin = knocks()
    bucket_echo = room(bucket, wet_db=-19, near_db=-10.5, near_t60=0.11)
    basin_echo = room(basin, wet_db=-9, near_db=-10.5, near_t60=0.017)
    hollow = .35 * resonant(basin_echo, basin_hz, 5) + 4 * resonant(bucket_echo, bucket_hz, 18)
    crabs = basin + bucket + basin_echo + bucket_echo + hollow + snaps() + scrabble() + stir()
    return (crabs + backdrop)[None]


def record(dry, limit_db=-3, recover_db_per_s=110, low_cut_hz=48):
    """A look-ahead limiter ducks before the hardest blows and eases back; peaks clip; both band edges are cut."""
    x, t = dry[0], np.arange(N) / SR
    level = np.sqrt(np.abs(uniform_filter1d(x ** 2, size=220)) + 1e-12)
    over = np.maximum(20 * np.log10(level) - limit_db, 0)
    # a moving maximum that starts ahead of each peak and holds past it
    over = -minimum_filter1d(-over, size=1100, origin=300)
    duck_db = np.maximum.accumulate(over + recover_db_per_s * t) - recover_db_per_s * t
    x = np.clip(x * amp(-uniform_filter1d(duck_db, size=200)), -.95, .95)
    x = signal.sosfilt(signal.butter(4, low_cut_hz, "highpass", fs=SR, output="sos"), x)
    return filtered(x, lambda f: 1 / np.sqrt(1 + (f / TOP_HZ) ** 200))[None]


dry = scene()
out = record(dry)
waveform_to_disk(out)
```